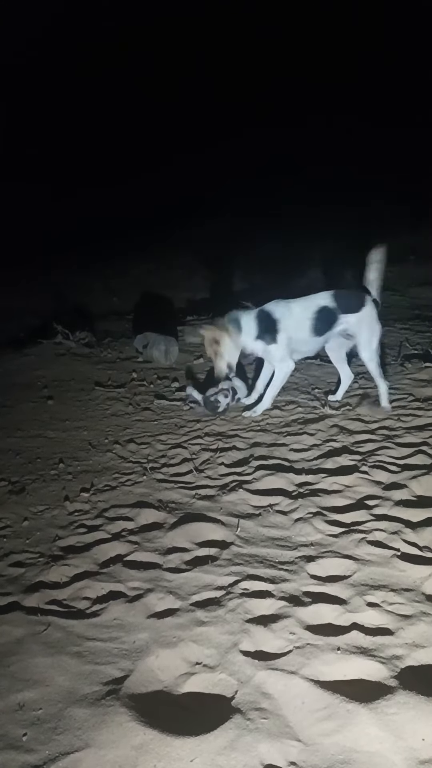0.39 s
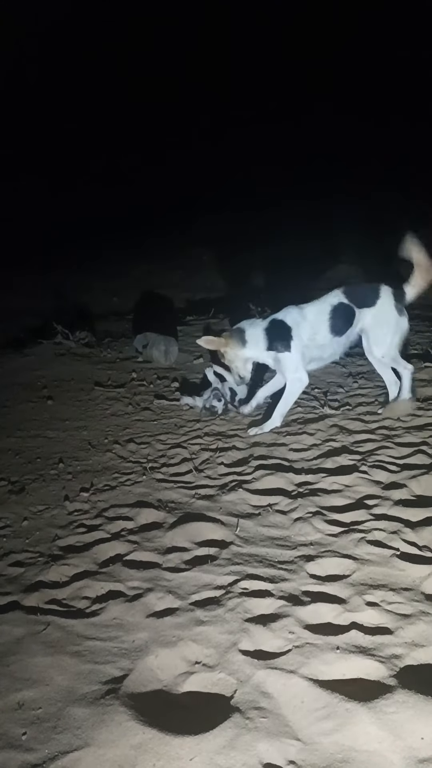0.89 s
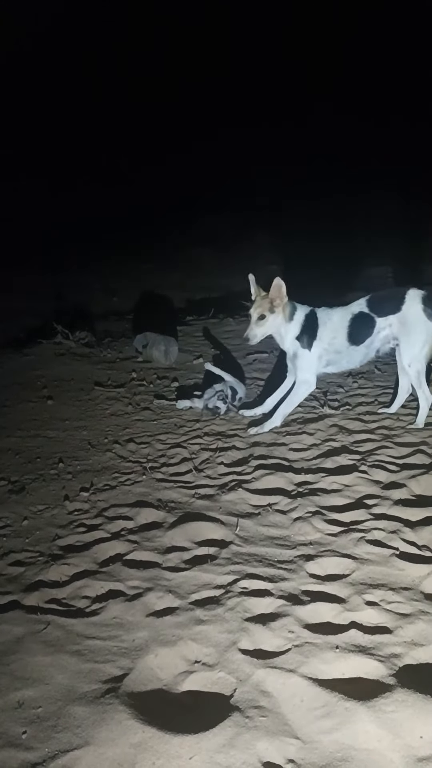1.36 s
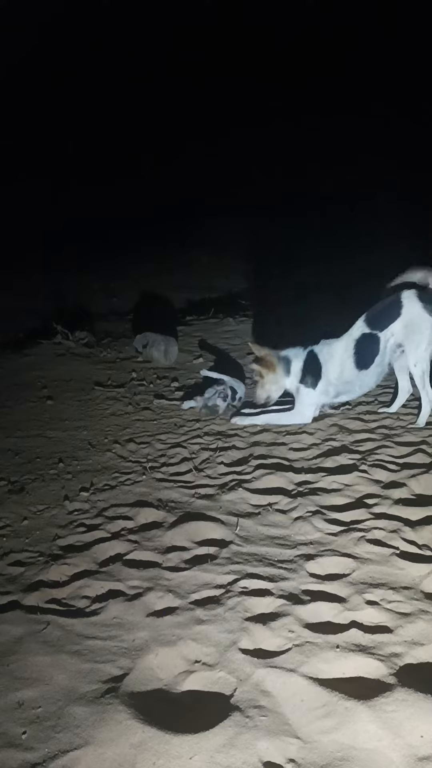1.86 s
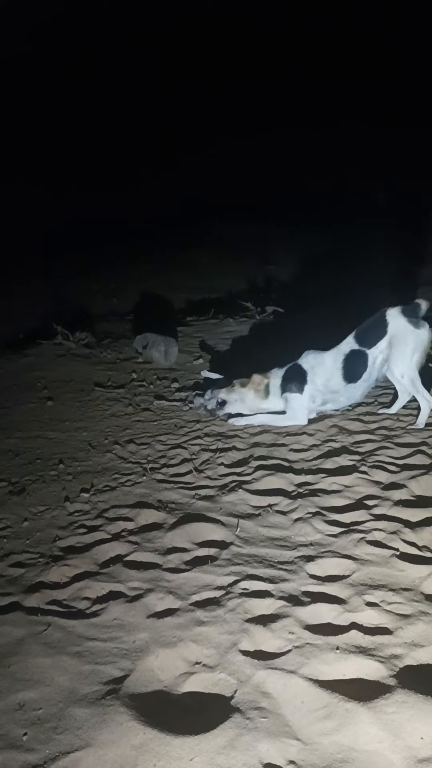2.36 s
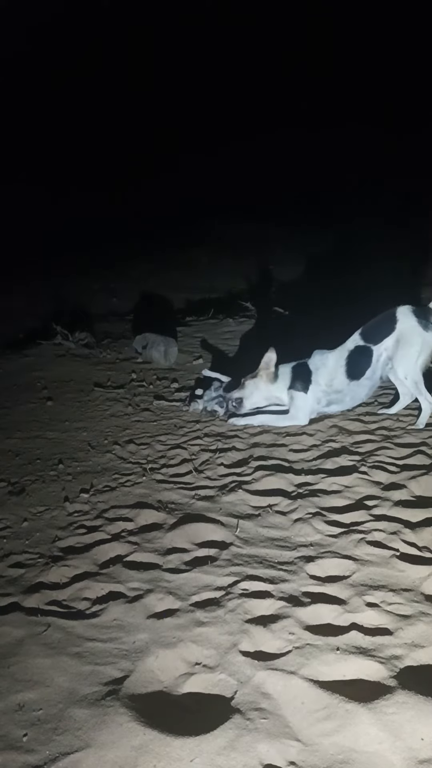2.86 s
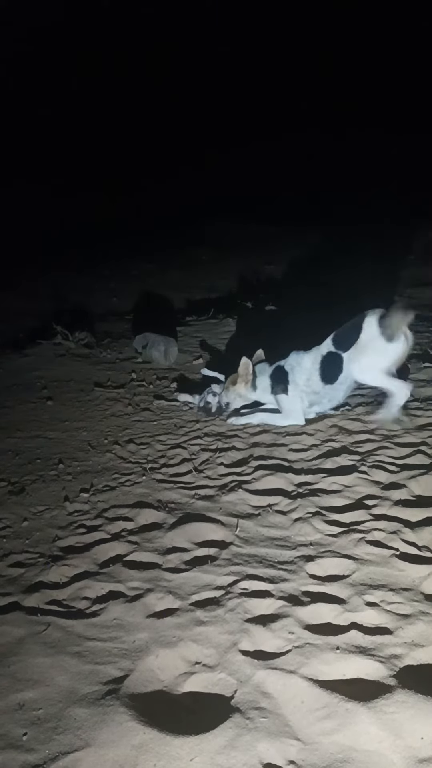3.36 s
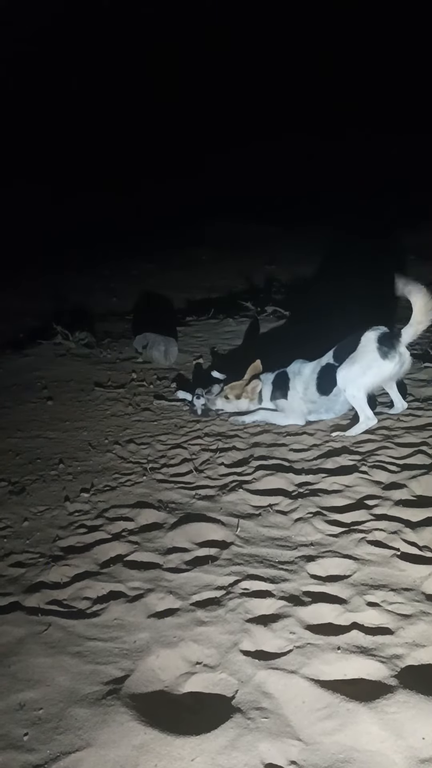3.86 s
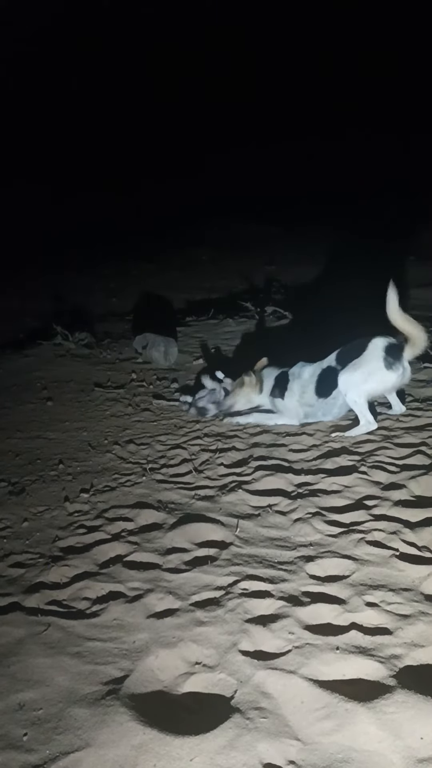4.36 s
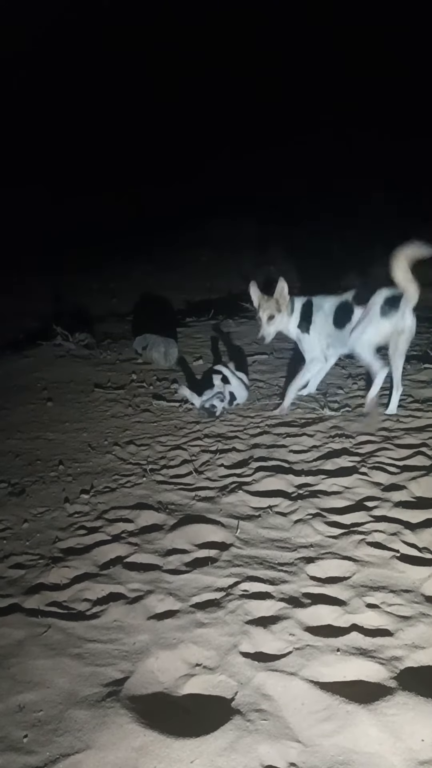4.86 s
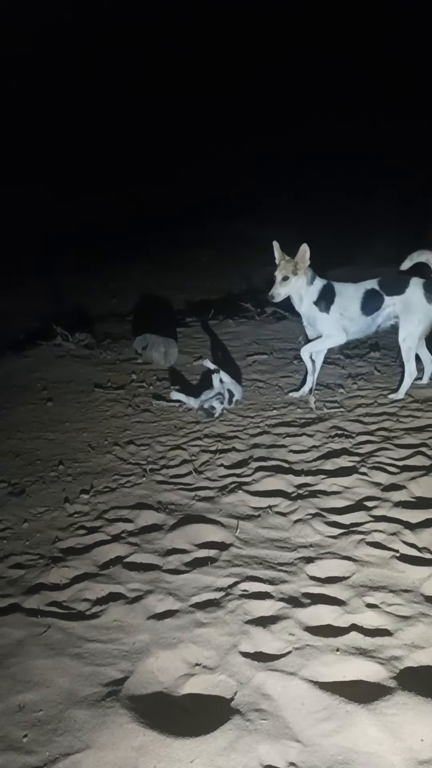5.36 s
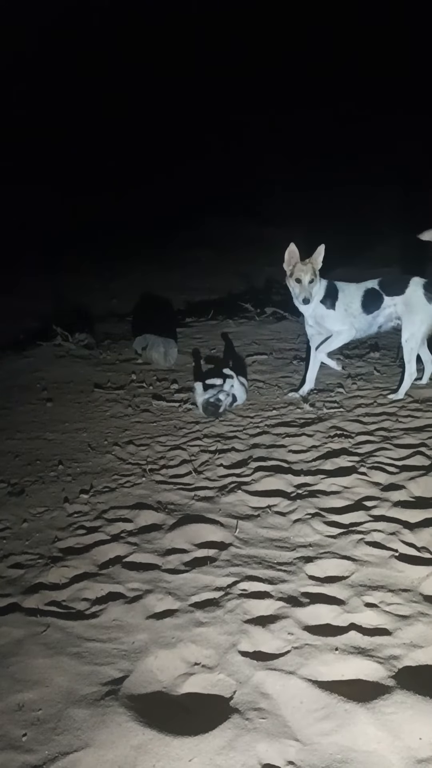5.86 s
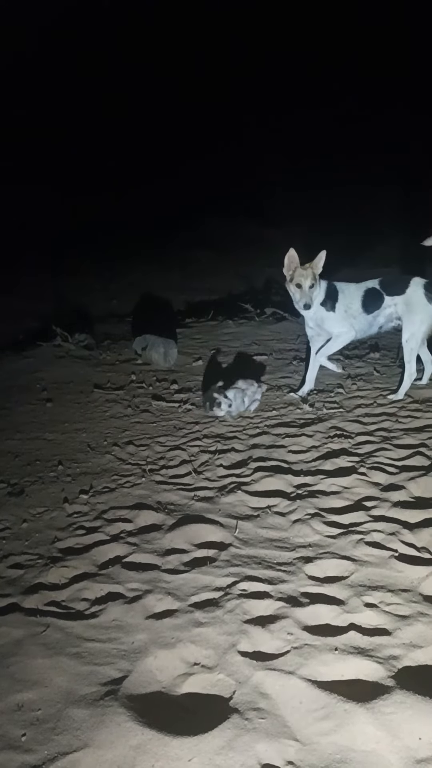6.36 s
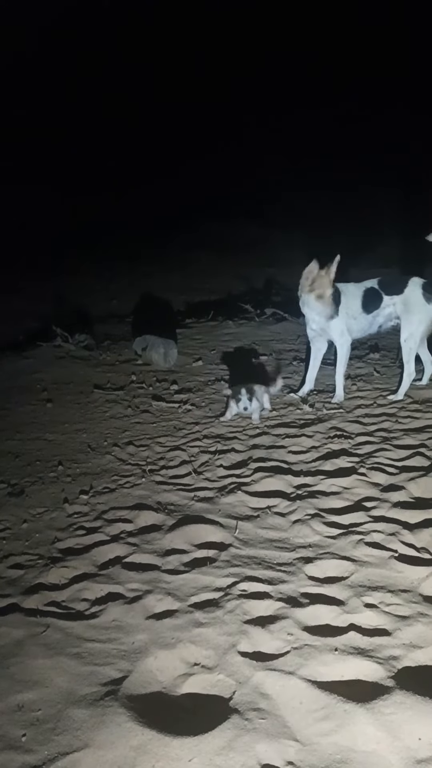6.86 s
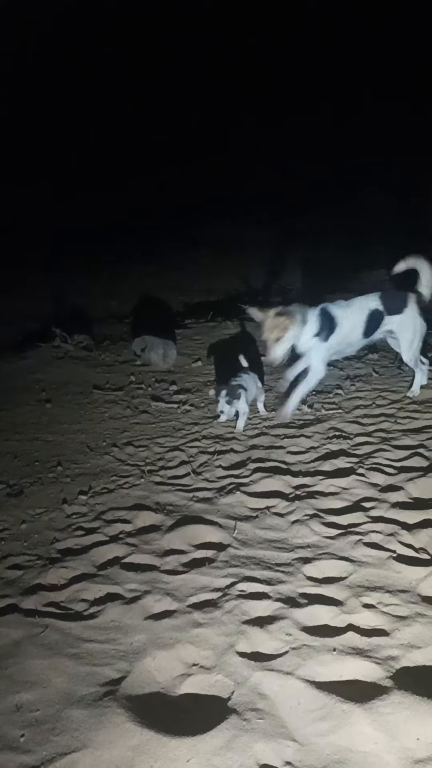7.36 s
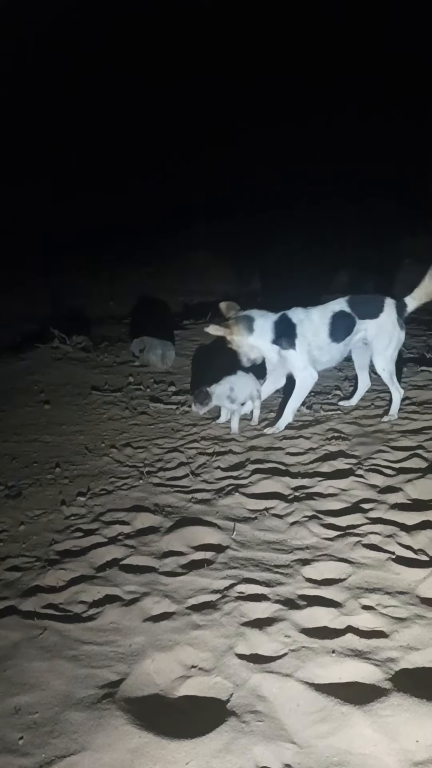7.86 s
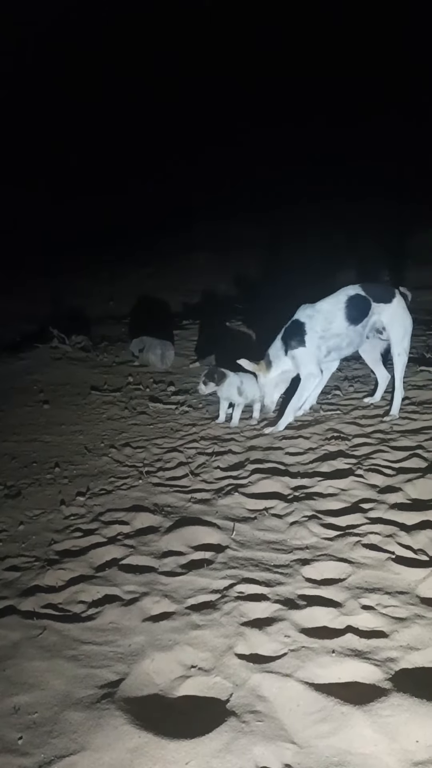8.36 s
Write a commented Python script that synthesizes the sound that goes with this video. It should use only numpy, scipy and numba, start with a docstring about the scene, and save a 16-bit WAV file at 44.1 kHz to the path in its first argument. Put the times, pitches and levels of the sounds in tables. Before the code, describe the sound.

Rough, fluttering play growls from a dog and puppy, a sudden high yelp midway, clicking jaws, scuffing sand and blustery low wind buffets.

```python
"""Dogs wrestling at night

A dog and her puppy wrestle on sand, a few metres from a phone with two microphone ports.
Growls, once climbing to a clear yelp, are fold pulses and breath noise through moving resonances.
Jaw snaps are struck resonances; breath and sand hiss as swelling, grainy noise.
Wind is separate low noise and single eddies at each port, over the faint shaped noise of the open night."""
import sys
import numpy as np
from scipy import signal
from scipy.fft import rfft, irfft
from scipy.io import wavfile
from scipy.ndimage import uniform_filter1d
from numba import njit

SR = 44100
rng = np.random.default_rng(int(sys.argv[2]) if len(sys.argv) > 2 else 0)


def ratio(d):
    """dB to gain"""
    e = np.asarray(d, float) / 20
    return 10 ** e


def generate_wav(signal):
    """Clip the signal to [-1, 1] and save it as 16-bit WAV at the path in sys.argv[1]."""
    frames = np.transpose(np.atleast_2d(signal))
    scaled = np.clip(frames, -1, 1) * 32767
    pcm = np.round(scaled).astype(np.int16)
    wavfile.write(sys.argv[1], SR, pcm)


N = 385434
T = np.arange(N) / SR  # time in seconds

# Spectrum of the open night. Each row: frequency in Hz, relative density in dB per Hz.
NIGHT_SPECTRUM = [(250, -91), (420, 4.5), (481, 1), (577, -2), (780, -1.5), (854, -3.5), (3220, -11.5),
                  (5900, -25), (10200, -30), (15500, -46)]
# Spectrum of wind rumble before gusts tilt it. Each row: frequency in Hz, relative density in dB per Hz.
WIND_SPECTRUM = [(25, -36.5), (50, 0), (80, 6), (120, 3), (180, -1.5), (260, -12), (400, -25.5),
                 (700, -71.5)]
# Course of the wind. Each row: time in seconds, strength in dB before RUMBLE_DB, left minus right in dB.
BREEZE = [(0.0, -48.5, 7.5), (1.68, -43, 7.5), (1.73, -42, -11.5), (1.82, -41, 11), (2.12, -43.5, 8),
          (2.21, -39.5, 27), (2.31, -46.5, 9.5), (2.347, -45, 1.5), (2.36, -39.5, -26.5),
          (2.41, -33.5, 12.5), (2.48, -47.5, 16.5), (2.58, -36.5, 24.5), (2.89, -32.5, -3),
          (3.43, -33.5, 11), (3.48, -42, 29.5), (3.55, -38, 0.5), (4.4, -49, 20.5), (4.55, -39.5, -22),
          (4.7, -42, 32.5), (4.84, -41, -16.5), (4.92, -44, 14), (5.23, -42, -5.5), (5.79, -51.5, 16.5),
          (5.96, -37.5, 0.5), (6.18, -42.5, 9.5), (6.47, -32, -13), (6.56, -44.5, -13.5),
          (6.68, -40.5, -9.5), (6.84, -43, 7), (7.16, -38, -7.5), (7.21, -42, 1.5), (7.45, -43.5, -10),
          (7.6, -35.5, -10.5), (7.7, -50, 5.5), (7.8, -45.5, 5.5), (8.03, -52.5, 13.5), (8.2, -43, 5),
          (8.74, -50.5, 12.5)]
# Eddies passing a port. Each row: time in seconds, port (0 left, 1 right), level in dB before the slap,
# frequency in Hz at that time.
BUFFETS = [(0.077, 0, -38, 148), (.247, 0, -30.5, 119.3), (1.122, 1, -28.5, 110), (1.177, 0, -28, 133),
           (1.215, 0, -25.5, 95.6), (1.439, 0, -25.5, 96), (1.67, 0, -27.5, 101.1), (2.125, 0, -29, 102.7),
           (3.63, 1, -26.5, 110.5), (3.7, 0, -27, 100), (3.72, 0, -32.5, 120), (3.847, 0, -33, 118.3),
           (4.126, 0, -24, 130.1), (4.382, 0, -28, 110), (4.803, 0, -28, 89.2), (4.945, 0, -25.5, 108.2),
           (5.11, 0, -28, 102.4), (5.21, 0, -26, 110.8), (5.482, 0, -33, 139), (5.566, 0, -32, 104.2),
           (6.304, 0, -27, 137), (6.883, 0, -27.5, 100), (7.036, 0, -24.5, 126), (7.428, 1, -33, 130),
           (7.994, 0, -37, 144.5), (8.006, 0, -29.5, 111.2), (8.102, 0, -30, 162.9), (8.19, 0, -27, 112.5),
           (8.208, 0, -23, 115.5), (8.28, 0, -27, 120.6), (8.486, 0, -40, 169), (0.784, 0, -18.5, 111.1),
           (1.483, 0, -25, 146.1), (1.73, 1, -24, 112.3), (0.946, 0, -24, 125.3), (1.512, 0, -13, 205.2),
           (1.557, 0, -16, 179.6), (2.059, 0, -23, 119.7), (2.186, 0, -14, 145.2), (2.256, 0, -25, 102.1),
           (2.361, 1, -10, 146.4), (2.381, 1, -19, 196.2), (2.406, 0, -22.5, 136.8),
           (2.548, 0, -25.5, 182.1), (2.6, 0, -14, 183), (2.612, 0, -17.5, 174.3), (2.649, 0, -18.5, 187.1),
           (2.677, 0, -15.5, 153.4), (2.724, 0, -16.5, 150.7), (2.739, 0, -25, 156.9),
           (2.788, 0, -25, 126.5), (2.802, 1, -27, 131), (2.877, 0, -14.5, 141.8), (2.913, 0, -19.5, 110.5),
           (3.011, 0, -17, 148), (3.051, 0, -14, 133.1), (3.045, 1, -23, 161.2), (3.127, 1, -21.5, 131.8),
           (3.24, 0, -27, 155), (3.312, 0, -24, 168.6), (3.163, 0, -23, 133.4), (3.278, 0, -20.5, 164.1),
           (3.332, 0, -18, 140.2), (3.334, 1, -21.5, 140.9), (3.39, 0, -13, 134), (3.461, 0, -22.5, 117.2),
           (3.496, 0, -17.5, 139.7), (3.516, 0, -16.5, 143.5), (4.069, 0, -23, 149.3),
           (4.105, 0, -17.5, 143), (4.168, 0, -24.5, 161.5), (4.683, 0, -17, 132.1), (4.726, 0, -22, 134),
           (6.337, 1, -23, 137.8), (6.383, 1, -22, 161), (6.408, 1, -21.5, 165), (6.485, 1, -24, 203),
           (6.508, 1, -17, 124), (6.981, 1, -24, 136), (7.135, 1, -20, 109), (6.106, 0, -27.5, 146),
           (6.624, 1, -26.5, 110), (7.223, 0, -26.5, 140), (7.319, 1, -28, 106), (7.561, 1, -33.5, 133.4),
           (8.226, 0, -19.5, 119), (8.669, 0, -25.5, 108.6)]
# Pants and scuffs of sand. Each row: loudest time in seconds, length in seconds, body level in dB,
# treble in dB against the body.
SCUFFS = [(0.499, 0.054, -62.5, -36), (0.923, 0.055, -71.5, 1), (1.056, 0.11, -66.5, -6),
          (2.292, 0.054, -62, -30), (4.645, 0.11, -67.5, -12.5), (4.705, 0.015, -66.5, -40),
          (4.75, 0.018, -74, 2), (4.822, 0.069, -62.5, -22), (7.322, 0.066, -70.5, -17),
          (7.426, 0.015, -69, -17), (7.521, 0.062, -64.5, -22), (7.597, 0.0441, -67.5, -13),
          (7.667, 0.053, -65.5, -12), (7.806, 0.12, -70, -8.5), (7.903, 0.025, -72, -15),
          (8.721, 0.084, -67.5, -16)]
# Treble resonances of the rustle. Each row: centre in Hz, width of one pass in Hz, relative level in dB.
RUSTLE_TREBLE = [(5600, 5000, -7), (7700, 3600, -10), (10600, 3800, -6.5), (14000, 2200, -16)]
# Jaw snaps and paw taps, some ringing both low and high over two rows.
# Each row: start in seconds, peak of the body in dB, ring in Hz.
SNAPS = [(.477, -51.5, 1692), (.717, -39, 1090), (2.298, -47, 1273), (4.473, -33.5, 1014),
         (4.49, -34, 1166), (4.561, -39, 781), (4.573, -45.5, 1772), (4.61, -43.5, 810), (4.844, -36, 1398),
         (4.892, -59, 1085), (5.124, -32, 1584), (5.147, -36, 2199), (5.124, -50, 4950), (5.146, -49, 5293),
         (5.163, -46, 4960), (5.186, -48, 5400), (4.49, -55, 5600), (5.16, -35, 1503), (5.186, -29, 1643),
         (7.499, -53, 2113), (7.556, -64, 985), (7.587, -39, 740), (7.779, -51, 780), (7.803, -49.5, 1910),
         (7.889, -49.5, 1741), (8.108, -45, 1337), (8.107, -44, 648.4), (4.226, -49, 949),
         (2.668, -44, 1700), (4.896, -38, 699)]
# Spells of palate flutter. Each row: first crest in seconds, length in seconds, flaps in Hz,
# pitch swing as a share before soft limiting.
FLUTTER = [(0.091, 0.28, 15.2, 0.2), (0.749, 0.12, 10.4, 0.16), (1.902, 0.16, 21.5, .12),
           (2.411, 0.14, 19.9, 0.11), (2.707, 0.4, 19.9, .12), (3.142, 0.24, 20.1, 0.14),
           (3.758, 0.22, 22.7, 0.2), (3.98, 0.25, 20.2, 0.21), (5, 0.45, 25.3, .15),
           (5.392, 0.25, 20.8, 0.19), (8.291, 0.18, 20.6, 0.14), (8.494, 0.22, 19.2, 0.16)]
# One table a growl. Each row: time in seconds, pitch in Hz, throat level in dB, mouth opening 0-1,
# roughness 0-1.
GROWLS = [
    [(0, 169.3, -59, 0.66, 0.28), (.06, 186.6, -45.5, 0.54, 0.35), (.21, 239.2, -42.5, 0.4, 0.18),
     (.242, 242.7, -53, 0.63, 0.41), (.29, 245, -43, 0.43, 0.01), (.33, 228.8, -52.5, 0.49, 0.34),
     (.41, 209.5, -48, 0.53, 0.27), (.455, 171.4, -60, 0.36, 0.24)],
    [(.58, 175.6, -61, 0.75, 0.22), (.588, 177.7, -53, 0.84, 0.16), (.6, 190.4, -47.5, 0.72, 0.08),
     (.628, 196, -50.5, 0.84, 0.1), (.65, 188.4, -45.5, 0.51, 0.51), (.69, 169.4, -56.5, 0.6, 0.65),
     (.72, 216.7, -46, 0.48, 0.29), (.76, 231.9, -47.5, 0.57, 0.24), (.8, 240.5, -45.5, 0.43, 0.57),
     (.84, 236, -44.5, 0.42, 0.25), (.878, 265.5, -43.5, 0.47, 0.37), (.905, 286, -45.5, 0.33, 0.18)],
    [(1.475, 149.2, -62, 0.7, 0.63), (1.51, 153.8, -56, 0.49, 0.61), (1.58, 158.7, -49.5, 0.49, 0.44),
     (1.72, 194.8, -50.5, 0.38, 0.08), (1.765, 166.1, -50.5, 0.45, 0.12), (1.825, 197.4, -50.5, 0.28, 0.02),
     (1.88, 167.3, -53.5, 0.4, 0.3), (1.943, 228.5, -45.5, 0.62, 0.23), (1.97, 216.2, -52.5, 0.74, 0.7),
     (2.0, 203.6, -53.5, 0.64, 0.88), (2.06, 185.1, -44.5, 0.6, 0.3), (2.14, 225.7, -43.5, 0.4, 0.28),
     (2.19, 205, -50, 0.37, 0.44), (2.2, 190.5, -60, 0.37, 0.36)],
    [(2.39, 171, -53, 0.53, 0.87), (2.424, 170.8, -49, 0.76, 0.62), (2.455, 168.9, -51, 0.35, 0.68),
     (2.504, 169.5, -53.5, 0.52, 0.65), (2.555, 169.4, -59, 0.4, 0.65)],
    [(2.63, 170.3, -56.5, 0.71, 0.61), (2.658, 170.4, -54, 0.55, 0.51), (2.67, 171, -49, 0.8, 0.43),
     (2.69, 170.4, -49.5, 0.81, 0.38), (2.73, 172.7, -53, 0.43, 0.59), (2.8, 173.7, -51.5, 0.43, 0.5),
     (2.88, 177.8, -51, 0.51, 0.51), (2.96, 182.2, -49.5, 0.56, 0.52), (2.977, 183.3, -51, 0.45, 0.55),
     (2.995, 185, -51.5, 0.56, 0.59), (3.05, 201.5, -45, 0.58, 0.26), (3.075, 224.9, -49, 0.58, 0.15),
     (3.105, 190.1, -50.5, 0.64, 0.27), (3.14, 197.9, -46.5, 0.62, 0.47), (3.2, 190.1, -51.5, 0.44, 0.58),
     (3.337, 198.9, -41, 0.32, 0.31), (3.395, 180.6, -42.5, 0.37, 0.35), (3.422, 193.2, -48, 0.52, 0.1)],
    [(3.672, 144.4, -51, 0.63, .25), (3.717, 189.8, -45, 0.54, 0.29), (3.78, 207.4, -47, 0.4, 0.4),
     (3.85, 213.3, -44, 0.45, 0.36), (4.03, 215.1, -44, 0.44, 0.25), (4.2, 219.2, -43.5, 0.45, .28),
     (4.228, 262.7, -46.5, 0.59, 0.16), (4.237, 224.6, -48, 0.42, 0.46), (4.243, 216.5, -40, 0.39, 0.29),
     (4.268, 273.8, -41, 0.56, 0.27), (4.298, 289.7, -41, 0.6, 0.15), (4.313, 236, -41.5, 0.77, 0.26),
     (4.322, 278.4, -44, 0.86, 0.17), (4.337, 358.8, -36.5, 0.72, 0.19), (4.348, 338, -41, 0.98, 0.04),
     (4.37, 360.7, -37.5, 0.92, 0.05), (4.402, 393.4, -37.5, 0.88, 0.02), (4.407, 422.8, -37.5, 0.78, 0.3),
     (4.421, 441.2, -37.5, 0.74, 0.3), (4.426, 448.3, -32.5, 0.83, 0.07), (4.431, 473.4, -45, 1, 0.03),
     (4.452, 481, -46, 0.83, 0.06), (4.465, 502.5, -44.5, 0.66, 0.38), (4.478, 406, -42.5, 0.23, 0.27),
     (4.492, 322, -47, 0.47, 0.33), (4.54, 268.6, -44, 0.48, 0.47)],
    [(4.92, 180.6, -46.5, 0.4, 0.28), (4.99, 194.8, -44, 0.48, 0.28), (5.034, 223.2, -44.5, 0.63, 0.49),
     (5.1, 222.5, -47.5, 0.72, 0.59), (5.135, 219.7, -48, 0.57, 0.66), (5.19, 216, -45, 0.39, 0.57),
     (5.22, 206.6, -52, 0.65, 0.6), (5.27, 229.4, -42.5, 0.42, 0.3), (5.39, 199, -49.5, 0.41, 0.41),
     (5.425, 205.7, -49, 0.55, 0.35), (5.45, 203.7, -48, 0.46, 0.44), (5.48, 204.3, -47.5, 0.59, 0.41),
     (5.565, 205, -51.5, 0.71, 0.46), (5.612, 205.5, -52, 0.52, 0.47), (5.675, 218.2, -48.5, 0.46, 0.32),
     (5.7, 230.8, -45, 0.28, 0.03)],
    [(8.127, 162.7, -46.5, 0.53, 0.41), (8.16, 180, -43, 0.41, 0.39), (8.19, 185, -47.5, 0.43, 0.36),
     (8.22, 165.9, -47, 0.47, 0.21), (8.256, 180.9, -42, 0.32, 0.19), (8.31, 194.6, -42.5, 0.24, 0.35),
     (8.39, 205.3, -44.5, 0.12, 0.32), (8.5, 207.7, -42.5, 0.11, 0.3), (8.6, 183.9, -46, 0.08, 0.34),
     (8.74, 182, -46, 0, 0.38)],
]
# Throat resonances. Each row: centre in Hz, width of one pass in Hz, relative level in dB.
THROAT = [(261, 156, 10), (788, 196, -9)]
# Back of the mouth. Each row: time in seconds, resonance in Hz, its strength in dB,
# strength of the highest mouth resonance in dB.
PHARYNX = [(0, 562, 6.5, -7.5), (.4, 530, 2.5, -1.5), (.58, 540, 8, -23), (.63, 526.6, 6, -20),
           (.68, 524.5, 0, 2), (.75, 518.4, 4.5, -9), (.9, 600, 2, -8), (1.5, 529.3, 5, -2),
           (1.62, 694, 1.5, -9), (1.85, 693, 1.5, 3), (1.95, 523, 9, -10), (2.0, 500.2, 5, -1),
           (2.07, 576, 7.5, -8), (2.2, 616.5, 6, -17), (2.4, 600, 4.5, -18), (2.55, 604.5, 5, -1),
           (2.65, 548.8, 24, -10), (3.05, 539.8, 8.5, -6), (3.42, 570.6, 6, -11), (3.68, 567.7, 10, -5.5),
           (3.9, 529, 7, -6.5), (4.2, 529.7, 9, -5.5), (4.3, 575, 13, -4), (4.34, 704, 4.5, -5),
           (4.4, 760, 10.5, -4.5), (4.45, 863, -4, -5), (4.5, 568, 16, 0), (4.92, 628, 10.5, -12),
           (5.05, 599, 2, -0.5), (5.15, 687.7, 0, -19), (5.27, 550.6, 12.5, -11), (5.5, 549.5, 4, -4.5),
           (5.7, 535.3, 6, -9), (8.127, 673.7, 6, -2), (8.17, 698.6, 4, -16), (8.22, 580.2, 7.5, -29),
           (8.3, 612, 5, -5), (8.45, 574, 6.5, -10), (8.74, 681, -5, 13)]
# Tongue. Each row: time in seconds, middle resonance in Hz, upper resonance in Hz,
# lift of the middle one in dB.
TONGUE = [(0, 1097, 1724, -11), (.3, 1050, 1727, -1.5), (.58, 1040, 1560, -3), (.6, 1040, 1760, -6.5),
          (.635, 1030, 1770, -1), (.69, 1040, 1810, -8), (.76, 1009, 1490, -1), (.8, 1150, 1730, -5),
          (.84, 1000, 1650, 3), (.9, 1140, 1706, -2), (1.5, 1115, 1845, -5.5), (1.8, 1130, 1720, -1.5),
          (1.94, 1045, 1742, -3), (2.02, 1041, 1831, -3), (2.08, 1039, 1620, -1.5), (2.2, 1250, 1749, 0.5),
          (2.42, 1019, 1589, 0.5), (2.52, 1103, 1762, 9.5), (2.68, 1011, 1545, -5), (2.76, 1009, 1740, 0),
          (3.1, 987.6, 1676, 0.5), (3.4, 1021, 1670, -3.5), (3.7, 1065, 1735, -6), (4.2, 1138, 1662, -6.5),
          (4.245, 1244, 1793, 4.5), (4.29, 1175, 1930, 0.5), (4.35, 1093, 1903, -4),
          (4.41, 1080, 2060, -5.5), (4.44, 962, 1986, 7), (4.47, 1003, 1837, 3), (4.54, 1056, 1823, -6),
          (4.95, 1047, 1692, -2), (5.03, 1050, 1789, 4), (5.09, 1073, 1586, 5.5), (5.2, 1129, 1856, 0),
          (5.23, 1300, 1850, -2), (5.26, 1250, 1600, 2), (5.3, 1012, 1620, -3), (5.5, 1012, 1699, 1.5),
          (5.56, 1066, 1806, 6), (5.61, 1097, 1598, -7), (5.68, 1322, 1515, 2.5), (8.127, 1268, 1739, 4),
          (8.165, 1313, 2039, -5), (8.195, 1313, 1902, -8), (8.225, 1050, 1620, -5), (8.26, 970, 1680, -5),
          (8.3, 930, 1486, -2), (8.4, 899.6, 1383, -3), (8.6, 860, 1329, -2), (8.74, 900, 1487, 1.5)]
# Parts of the mouth against the throat. Each pair: level when shut in dB, gain when wide open in dB.
MIDDLE_MOUTH = (-17.5, 22.5)
UPPER_MOUTH = (-34.5, 48)
MOUTH_BREATH = (-49.5, 35.5)
# Breath resonances. Each row: centre in Hz, width of one pass in Hz, level in dB before strain.
BREATH = [(2850, 970, 0), (4000, 1900, -1.5), (4940, 600, 7)]
# Rasp resonances, fading as pitch climbs. Each row: centre in Hz, width of one pass in Hz,
# level in dB before strain.
RASP_RING = [(4560, 430, 1), (5600, 870, 1)]
# Topmost hiss. Each row: centre in Hz, width of one pass in Hz, relative level in dB.
SHEEN = [(8100, 3700, 5.5), (11040, 1400, 7), (12960, 3300, 1.5)]
# Changes of rasp in the breath. Each row: strongest time in seconds, length in seconds, gain in dB.
RASPS = [(0.103, 0.29, 3.5), (0.602, 0.054, -3.5), (0.821, 0.048, 12.5), (2.099, 0.056, 6.5),
         (2.416, 0.029, -1.5), (2.511, 0.091, 15), (2.68, 0.036, -13), (2.945, 0.056, 8),
         (3.045, 0.052, 10), (3.14, 0.051, 4.5), (3.267, 0.046, 8), (3.322, 0.038, 8), (3.389, 0.045, 7.5),
         (4.195, 0.024, -5), (4.256, 0.044, 9.5), (4.312, 0.032, 9), (4.394, 0.028, 7.5),
         (5.07, 0.085, -0.5), (5.02, 0.018, 6), (8.138, 0.027, -1)]
# The dogs at the two ports. Each row: frequency in Hz, left minus right in dB.
PORT_LEVEL = [(200, -0.5), (400, 3.5), (700, 4), (1290, 5.5), (2380, -9), (3300, 8), (4400, 4.5),
              (8120, 2.5), (11000, 31.5), (15000, 3.5)]
# The dogs at the two ports. Each row: frequency in Hz, phase in radians by which left leads.
PORT_PHASE = [(0, 0), (1120, 0.6), (1550, -0.5), (2930, 2.3), (3790, 2.2), (4740, 6.7), (5170, 6.3),
              (6200, 7.8), (6460, 8.8), (7840, 10.0), (8700, 14.5), (9300, 15.8), (12200, 16.9),
              (15200, 23.0)]

NIGHT_DB = -64
RUMBLE_DB = -0.5  # steady rumble against the wind's whole strength
LULL_DB, LULLS_PER_S = 3.8, 11  # small gusts and lulls, each port its own
GUST_LIMIT_DB, GUST_SPAN_S = 8, 0.5  # gusts flatten out; their strength evens over this span
GUST_TILT, CALM_DB = 0.51, -40  # dB of deep bass lost and upper rumble gained per dB over calm
EDDY_MS, EDDY_GROWTH_PER_DB = 2.9, 0.062  # length of a 0 dB eddy; weaker ones pass more slowly
SCUFF_RISE = 0.79  # the rise is this share of the fall
SNAP_T60_S, SNAP_TREBLE_DB = 0.018, -20
FLUTTER_EDGE_S, GROWL_EDGE_S = 0.04, 0.0077
JITTER, SHIMMER = 0.22, 0.38  # scatter of period and size in the roughest voice, as natural logs
HALF_BEAT = 0.4  # a rough voice alternates strong and weak closings by this share
WOBBLE_DB, WOBBLE_PER_S = 2.5, 50  # each part wavers on its own, more in a rough voice
WANDER, WANDER_PER_S = 0.06, 70  # a rough voice shifts the mouth resonances by this share
PHARYNX_WIDTH_HZ = 292
STRAIN_HZ, STRAIN_DB_PER_OCTAVE = 293.6, 27.5  # above this pitch the breath grows
SHEEN_AIR = 0.9  # extra share of breath noise in the topmost hiss


@njit
def svf(x, hz, width):
    """State-variable resonance: a band-pass whose centre may move, with gain 1 at the centre."""
    y, band, low = np.empty(len(x)), 0., 0.
    for i in range(len(x)):
        g, damping = np.tan(np.pi * hz[i] / SR), width / hz[i]
        v = (band + g * (x[i] - low)) / (1 + g * (g + damping))
        band, low = 2 * v - band, low + 2 * g * v
        y[i] = damping * v
    return y


def steep(x, hz, width):
    """Cascaded resonance: two equal band-passes in series steepen the skirts."""
    centre = hz + 0 * T
    return svf(svf(x, centre, float(width)), centre, float(width))


def ring(x, modes):
    """Modal superposition: steep resonances are summed, alternate ones inverted."""
    return sum((-1) ** k * ratio(db) * steep(x, hz, width) for k, (hz, width, db) in enumerate(modes))


def even(x, span_s=0.064):
    """Level normalisation: division by the running rms brings it to 1."""
    return x / np.sqrt(uniform_filter1d(x ** 2, int(span_s * SR)) + 1e-12)


def walk(rate):
    """Smoothed random process: levels held 1 / rate s are slewed twice; spread near 1."""
    hold = int(SR / rate)
    held = np.repeat(rng.standard_normal(N // hold + 1), hold)
    return 1.67 * uniform_filter1d(uniform_filter1d(held, hold), hold)[:N]


def columns(tables):
    """Linear interpolation: a curve for every column, and a gate open while a table lasts."""
    s, *cols = np.transpose(np.vstack(tables))
    gate = sum((T >= t[0][0]) & (T < t[-1][0]) for t in tables)
    return [np.interp(T, s, c) for c in cols], uniform_filter1d(1. * gate, int(GROWL_EDGE_S * SR))


def coloured(points):
    """Spectral shaping: white noise is weighted in frequency and scaled to rms 1."""
    hz, db = np.transpose(points)
    f = np.arange(N // 2 + 1) * SR / N + 1
    weight = ratio(np.interp(np.log(f), np.log(hz), db))
    x = irfft(rfft(rng.standard_normal(N)) * weight, N)
    return x / x.std()


def night():
    """Diffuse background: independent shaped noise at each port, its level slowly wavering."""
    return np.array([coloured(NIGHT_SPECTRUM) * ratio(NIGHT_DB + 0.36 * walk(6.9)) for _ in range(2)])


def rumble(strength_db):
    """Turbulent pressure noise: its spectrum tilts from deep bass upward as the wind strengthens."""
    x = coloured(WIND_SPECTRUM)
    tilt_db = GUST_TILT * (strength_db - CALM_DB).clip(-12, 14)
    deep, upper = svf(x, 48 + 0 * T, 95.0), svf(x, 300 + 0 * T, 180.0)
    return x + (ratio(-tilt_db) - 1) * deep + (ratio(tilt_db) - 1) * upper


def gusty_rumble(port_db):
    """Intermittent turbulence: random gusts, softly limited, modulate the rumble at one port."""
    gust_db = 4.67 * walk(30) + LULL_DB * walk(LULLS_PER_S)
    limited_db = GUST_LIMIT_DB * np.tanh(gust_db / GUST_LIMIT_DB)
    gust_db = np.where(gust_db > 0, limited_db, 1.22 * gust_db)
    x = even(rumble(port_db) * ratio(gust_db), GUST_SPAN_S)
    return x / x.std() * ratio(port_db)


def eddy(t, db, hz, turn):
    """Vortex passage: a brief tone burst sags in pitch; strong ones gain harmonics at their peak."""
    length_ms = EDDY_MS * np.exp(-EDDY_GROWTH_PER_DB * db)
    # the eddy slows as it passes, so its pitch sags; turn is its starting phase
    spin = 2 * np.pi * (hz * t * (1 - 6 * t) + turn)
    swell = 2 ** (-(2 * t / length_ms * 1000) ** 2)
    slap = ratio(0.29 * db - 7.5) * swell ** 3 * (np.sin(2 * spin) + 0.2 * np.sin(3 * spin))
    return ratio(db) * (swell * np.sin(spin) + slap)


def wind():
    """Local turbulence: rumble is unrelated at the two ports, and each eddy thuds past only one."""
    (strength_db, pan_db), _ = columns([BREEZE])
    out = np.array([gusty_rumble(strength_db + side * pan_db / 2 + RUMBLE_DB) for side in (1, -1)])
    for (s, port, db, hz), turn in zip(BUFFETS, rng.random(len(BUFFETS))):
        near = slice(max(int((s - .06) * SR), 0), int((s + .06) * SR))
        out[int(port), near] += eddy(T[near] - s, db, hz, turn)
    return out


def grains():
    """Granular excitation: noise samples of widely uneven size, with a wavering level."""
    size_db = 2.2 * rng.exponential(size=N) + 2 * walk(60)
    return rng.standard_normal(N) * ratio(size_db)


def rustle():
    """Amplitude modulation: grainy body and treble hiss swell and fade with each pant or scuff."""
    treble = ring(grains(), RUSTLE_TREBLE)
    body = ring(grains(), [(1360, 2200, 18), (3300, 680, -25.0)])
    body_gain, treble_gain = 0, 0
    for s, length, db, treble_db in SCUFFS:
        span = length * np.where(T < s, SCUFF_RISE, 1)
        swell = 2 ** -(2 * (T - s) / span) ** 2
        body_gain = body_gain + ratio(db) * swell
        treble_gain = treble_gain + ratio(db + treble_db) * swell
    return treble_gain * treble / treble.std() + body_gain * body / body.std()


def snaps():
    """Impact response: a tick and decaying noise strike one broad resonance and a thin treble edge."""
    size = 2000
    out, t = np.zeros(N + size), np.arange(size) / SR
    for (s, db, hz), crack in zip(SNAPS, rng.standard_normal((len(SNAPS), size))):
        knock = (crack + 6 * (t == 0)) * np.exp(-np.log(1000) * t / SNAP_T60_S)
        body = svf(svf(knock, hz + 0 * t, 470.0), hz + 0 * t, 830.0)
        edge = svf(knock, 6500 + 0 * t, 7000.)
        snap = body / abs(body).max() + ratio(SNAP_TREBLE_DB) * edge / abs(edge).max()
        start = int(s * SR)
        out[start:start + size] += ratio(db) * snap
    return out[:N]


def flutter():
    """Frequency modulation: the flapping soft palate swings the pitch by a share, softly limited."""
    out = 0
    for s, length, hz, depth in FLUTTER:
        to_edge = np.minimum(T - s, s + length - T)
        spell = np.clip(to_edge / FLUTTER_EDGE_S + .5, 0, 1)
        out = out + depth * spell * np.tanh(1.5 * np.cos(2 * np.pi * hz * (T - s)))
    return out


@njit
def folds(hz, rough, chance, jitter, shimmer, half):
    """Glottal excitation: one pulse per fold closing; roughness scatters its period and size."""
    pulses, phase, p, k = np.zeros(len(hz) + 1), np.empty(len(hz)), 0., 0
    for i in range(len(hz)):
        step = hz[i] * np.exp(jitter * rough[i] * chance[k, 0]) / SR
        p += step
        if p >= 1:
            p, k = p - 1, k + 1
            alternate = 1 + half * rough[i] * (2 * (k % 2) - 1)
            size = np.exp(shimmer * rough[i] * chance[k, 1]) * alternate
            # the pulse is shared by two samples, so it may fall between them
            pulses[i] += size * p / step
            pulses[i + 1] += size * (1 - p / step)
        phase[i] = p
    return pulses[:-1], phase


def throat_part(low):
    """Vocal-tract resonance: fixed throat modes and a moving one at the back of the mouth."""
    (back_hz, back_db, _), _ = columns([PHARYNX])
    back = steep(low, back_hz, PHARYNX_WIDTH_HZ)
    return even(ring(low, THROAT[:1]) - ratio(back_db) * back + ring(low, THROAT[1:]))


def mouth_parts(high, rough):
    """Formant motion: the tongue moves the middle and upper resonances, and roughness shakes them."""
    (mid_hz, up_hz, _), _ = columns([TONGUE])
    (_, _, top_db), _ = columns([PHARYNX])
    mid_hz, up_hz = (f * np.exp(WANDER * rough * walk(WANDER_PER_S)) for f in (mid_hz, up_hz))
    middle = even(steep(high, mid_hz, 340) - ring(high, [(1310, 220, -7)]))
    # the highest resonance rides along with the upper one
    top_hz = 2230 + 0.79 * (up_hz - 1750)
    upper = steep(high, up_hz, 420) - ratio(top_db) * steep(high, top_hz, 330)
    upper = upper - 1.4 * ring(high, [(1620, 77, 0.0044)])
    return middle, even(upper)


def breath_part(high, air, hz, rough):
    """Turbulent excitation: breath resonances brighten and the rasp ring fades as pitch climbs."""
    sheen_gain = ratio(-12 + 3.1 * np.log2(hz / 340).clip(0))
    sheen = sheen_gain * ring(high + SHEEN_AIR * air, SHEEN)
    strain = np.log2(hz / 250).clip(-.5, 1)  # octaves
    airy = high + (.3 + .6 * rough) * air
    rasp = ratio(-14.0 * strain) * ring(airy, RASP_RING)
    return even(ratio(10.0 * strain) * ring(airy, BREATH) + rasp + sheen)


def voice():
    """Source-filter principle: fold pulses and cycle-gated breath excite throat and mouth."""
    (hz, db, jaw, rough), gate = columns(GROWLS)
    rough, flap = np.clip(rough, 0, 1), flutter()
    chance = rng.standard_normal((N // 50, 2))
    pulses, phase = folds(hz * np.exp(flap), rough, chance, JITTER, SHIMMER, HALF_BEAT)
    pulses = pulses * np.sqrt(SR / hz) * ratio(2.0 * flap)  # the palate sways the level slightly too
    # breath fades through each cycle
    air = rng.standard_normal(N) * np.exp(-phase / .3) * ratio(1.3 * walk(40))
    # turbulence is strongest in the upper resonances
    low = pulses + 2.5 * rough ** 2 * air
    high = pulses + 16 * rough ** 2 * air

    mid_db, up_db, air_db = (db + shut + gain * jaw + WOBBLE_DB * rough * walk(WOBBLE_PER_S)
                             for shut, gain in (MIDDLE_MOUTH, UPPER_MOUTH, MOUTH_BREATH))
    (_, _, lift_db), _ = columns([TONGUE])
    mid_db = mid_db + lift_db
    air_db = air_db + STRAIN_DB_PER_OCTAVE * np.log2(hz / STRAIN_HZ).clip(0)
    for s, length, gain_db in RASPS:
        air_db = air_db + gain_db * 2 ** -(2 * (T - s) / length) ** 2

    throat = throat_part(low)
    middle, upper = mouth_parts(high, rough)
    breath = breath_part(high, air, hz, rough)
    return gate * (ratio(db) * throat - ratio(mid_db) * middle + ratio(up_db) * upper + ratio(air_db) * breath)


def at_ports(x):
    """Two-point reception: level and phase differences with frequency are split between the ports."""
    f = np.arange(N // 2 + 1) * SR / N
    half_level = ratio(np.interp(f, *np.transpose(PORT_LEVEL)) / 2)
    tilt = half_level * np.exp(.5j * np.interp(f, *np.transpose(PORT_PHASE)))
    scale = np.abs(tilt + 1 / tilt).clip(1) / 2
    return np.array([irfft(rfft(x) * g / scale, N) for g in (tilt, 1 / tilt)])


def scene():
    """Linear superposition: the night's hiss, the wind and the dogs add at the two ports."""
    return night() + wind() + at_ports(rustle() + snaps() + voice())


def top_cut(x):
    """Nothing passes above the cut-off."""
    return signal.sosfilt(signal.butter(12, 15680, fs=SR, output="sos"), x)


def record(dry):
    """High-pass filtering: the phone cuts the deepest bass."""
    bass_cut = signal.butter(2, 55, "high", fs=SR, output="sos")
    mix = signal.sosfilt(bass_cut, dry)
    return top_cut(mix)


dry = scene()
out = record(dry)
generate_wav(out)
```